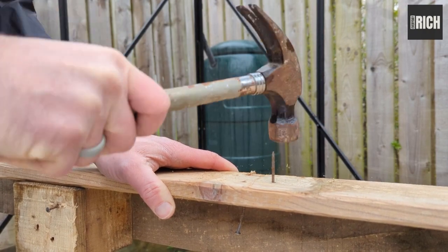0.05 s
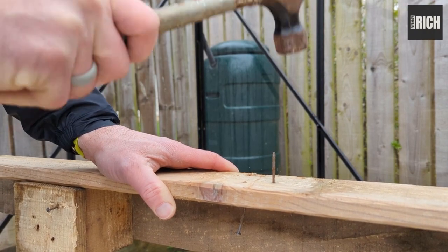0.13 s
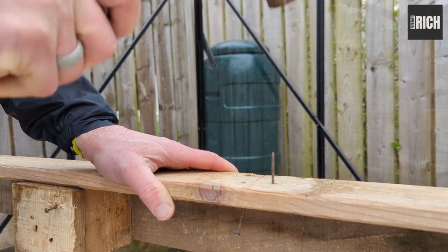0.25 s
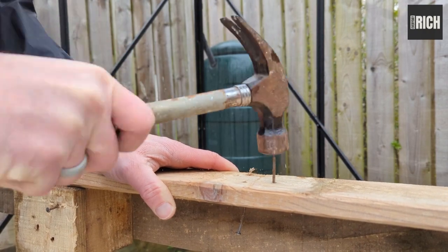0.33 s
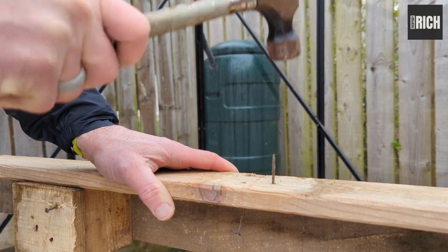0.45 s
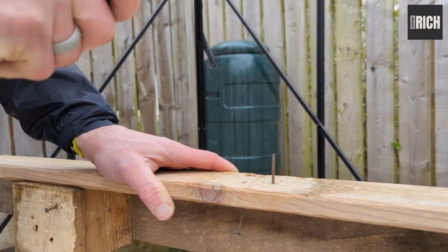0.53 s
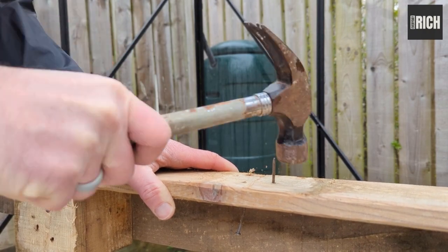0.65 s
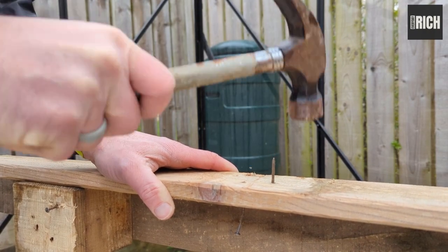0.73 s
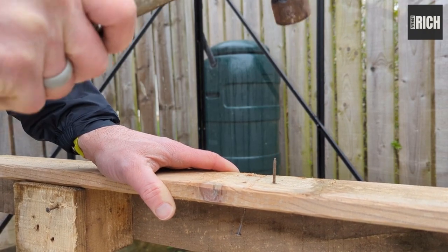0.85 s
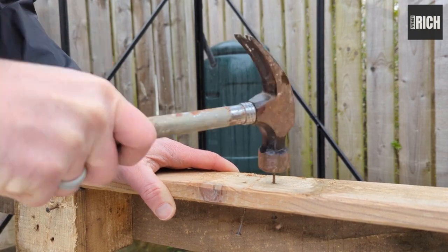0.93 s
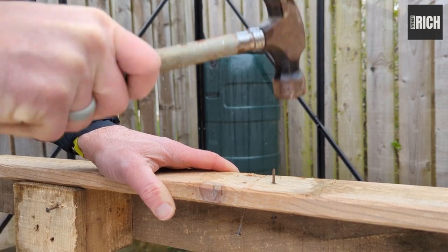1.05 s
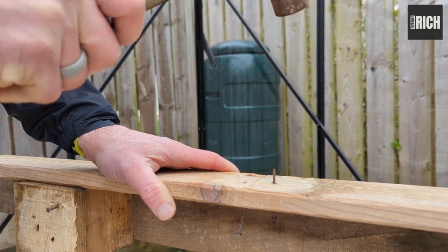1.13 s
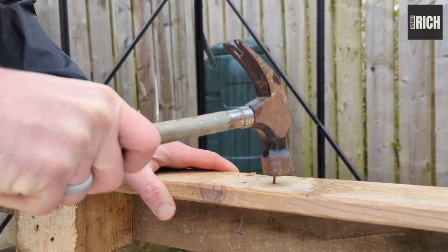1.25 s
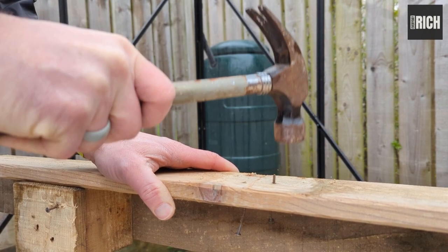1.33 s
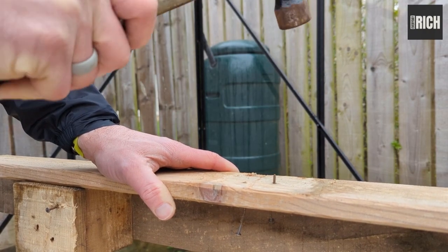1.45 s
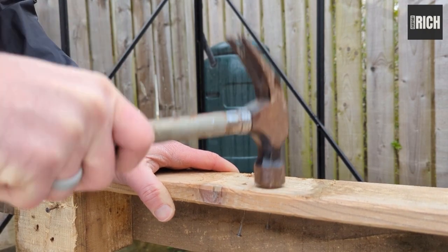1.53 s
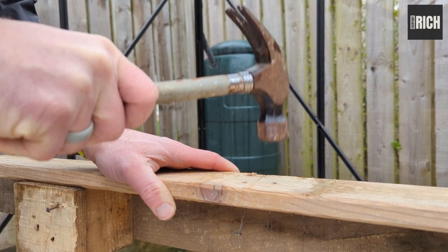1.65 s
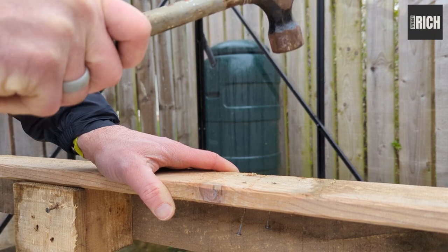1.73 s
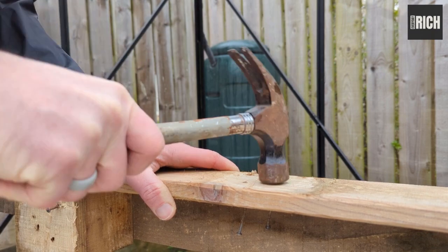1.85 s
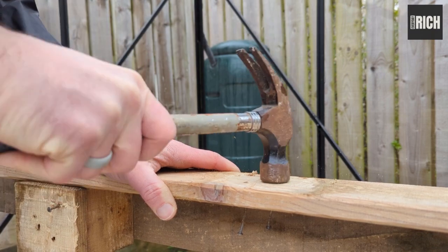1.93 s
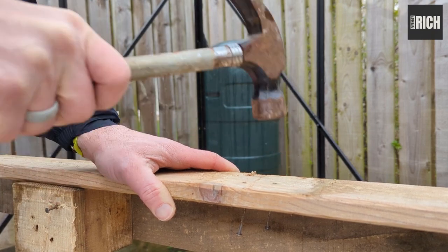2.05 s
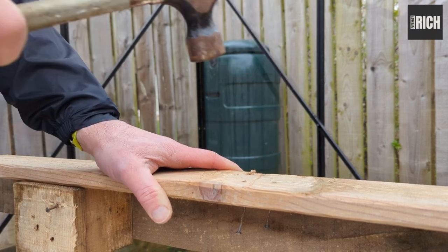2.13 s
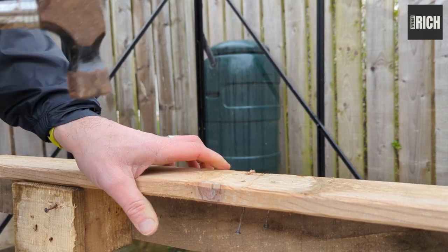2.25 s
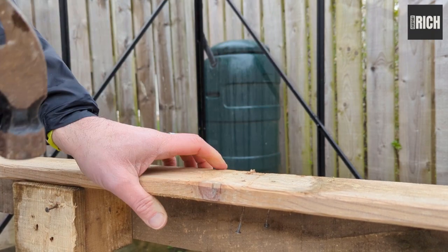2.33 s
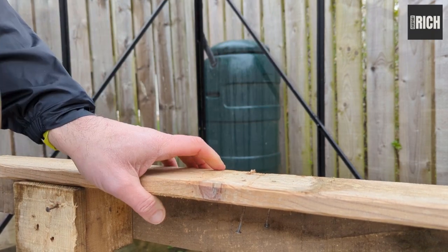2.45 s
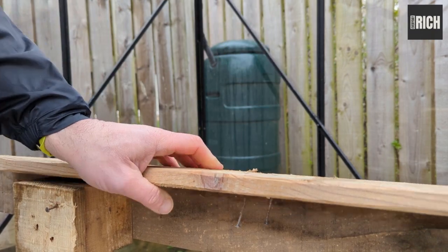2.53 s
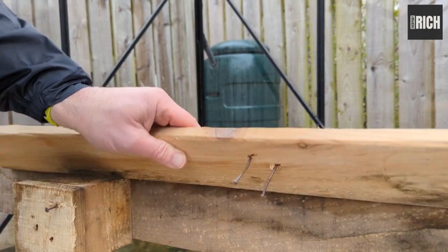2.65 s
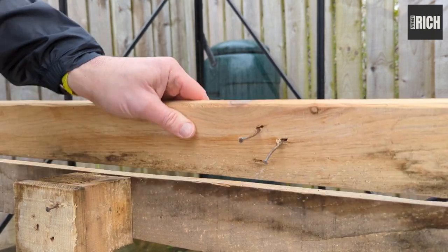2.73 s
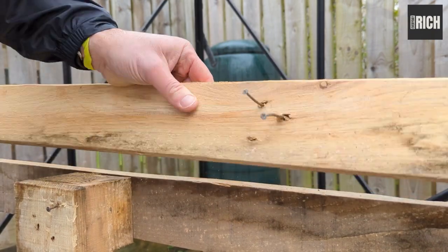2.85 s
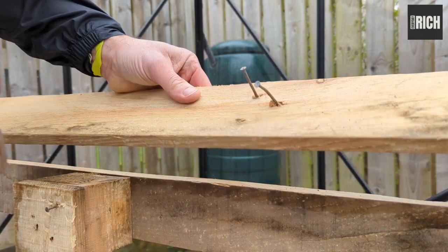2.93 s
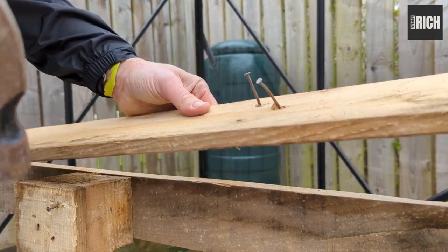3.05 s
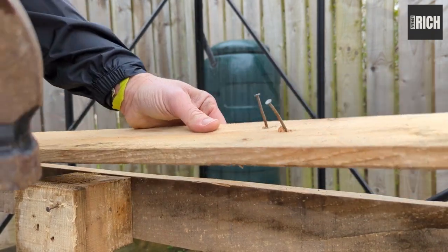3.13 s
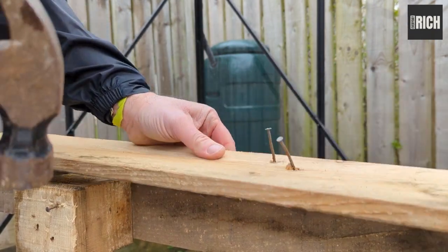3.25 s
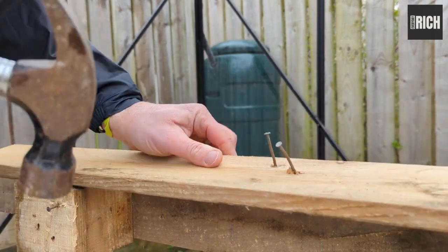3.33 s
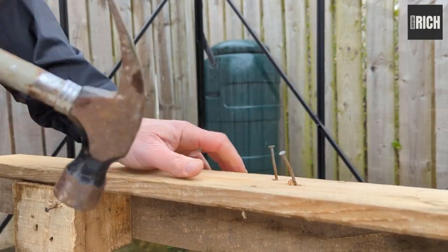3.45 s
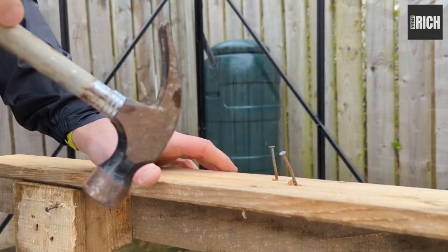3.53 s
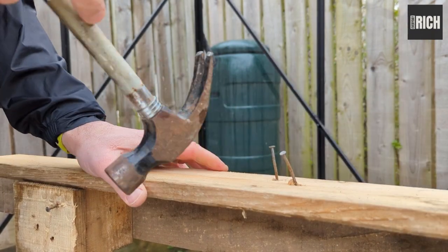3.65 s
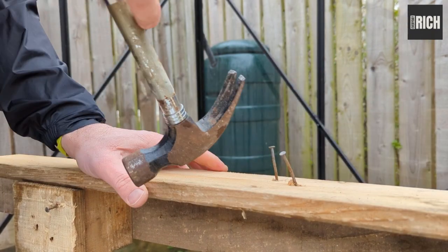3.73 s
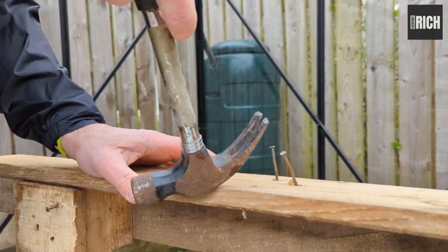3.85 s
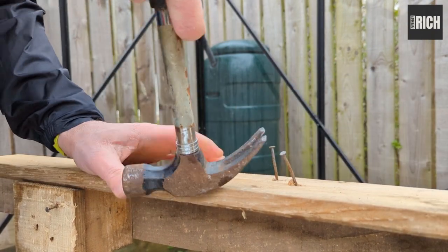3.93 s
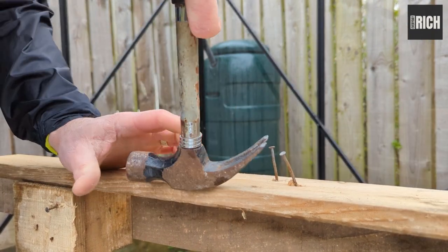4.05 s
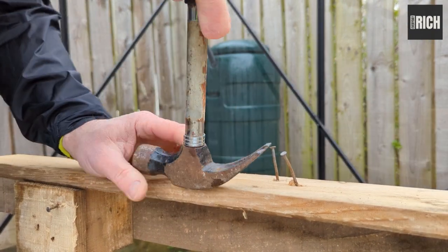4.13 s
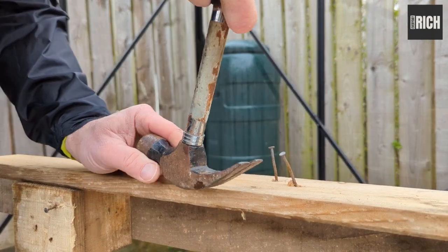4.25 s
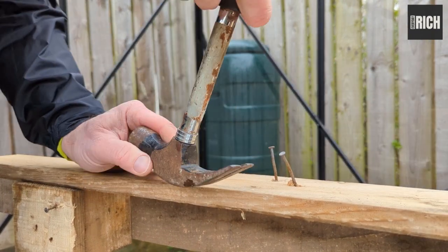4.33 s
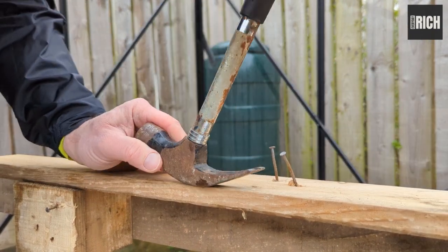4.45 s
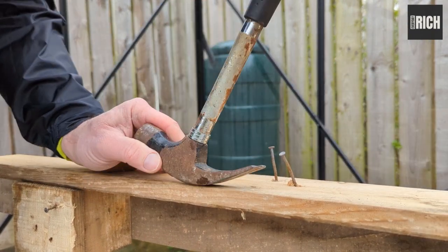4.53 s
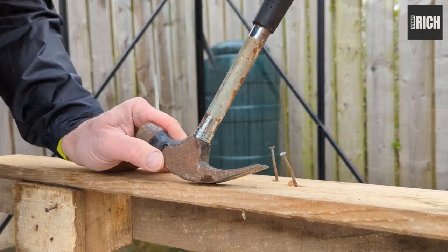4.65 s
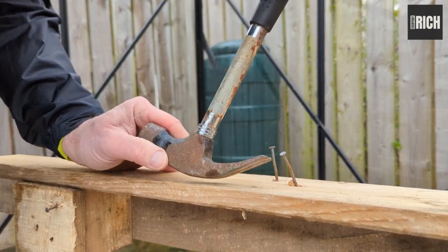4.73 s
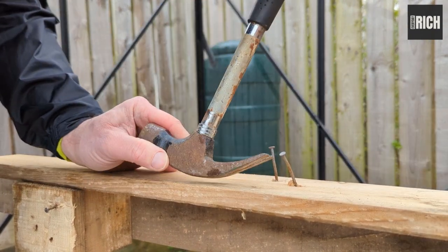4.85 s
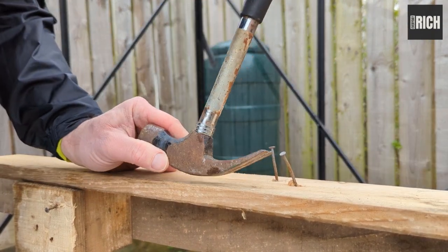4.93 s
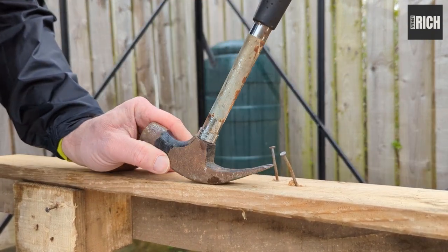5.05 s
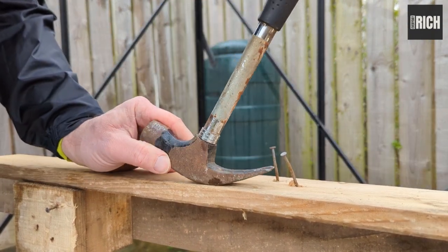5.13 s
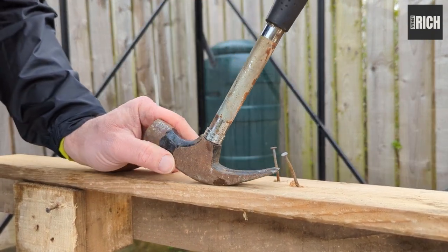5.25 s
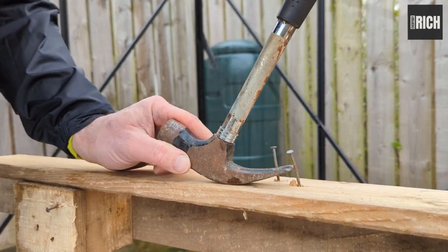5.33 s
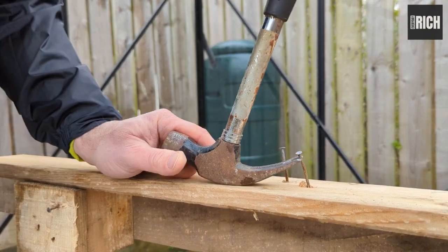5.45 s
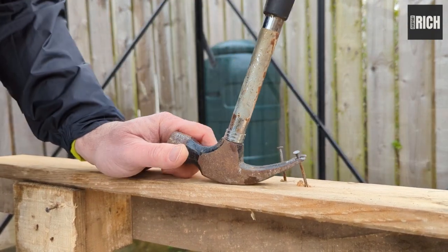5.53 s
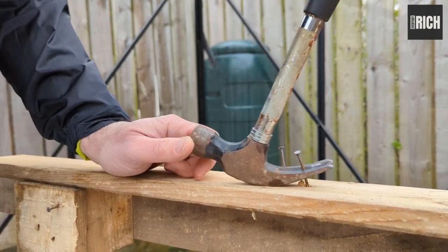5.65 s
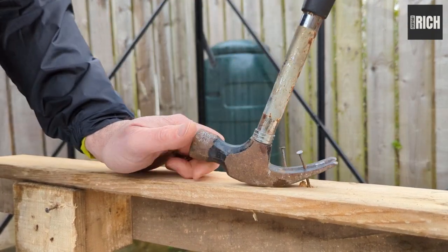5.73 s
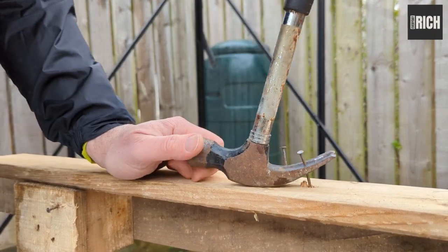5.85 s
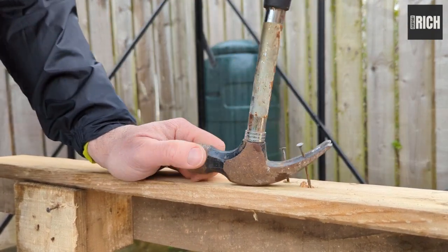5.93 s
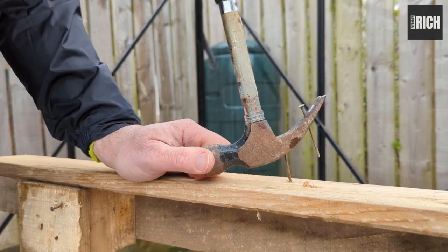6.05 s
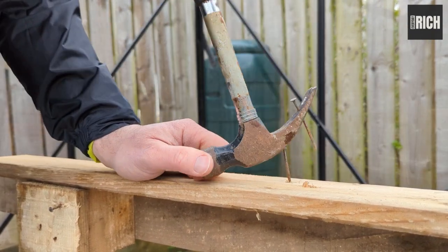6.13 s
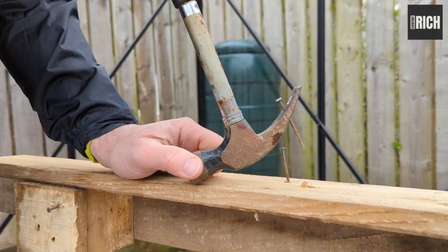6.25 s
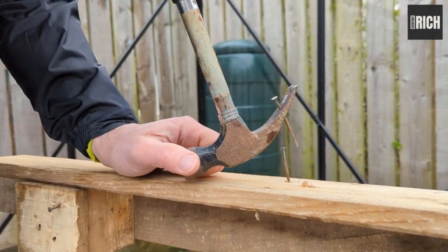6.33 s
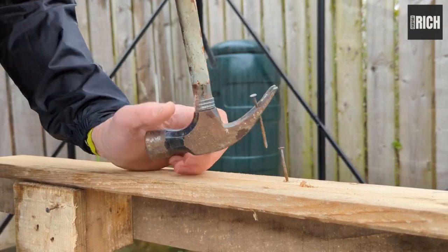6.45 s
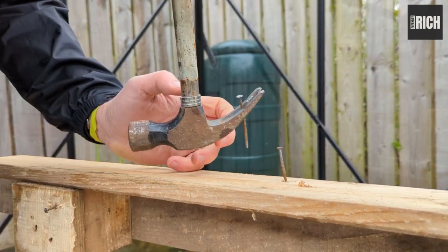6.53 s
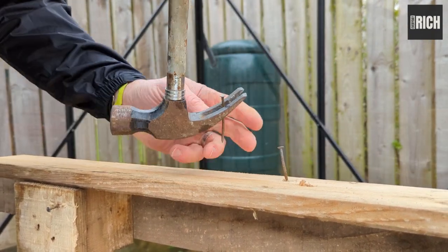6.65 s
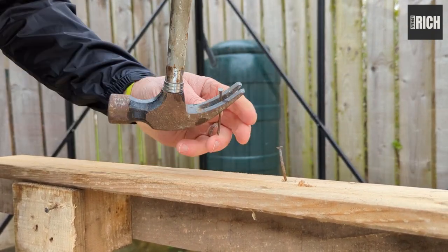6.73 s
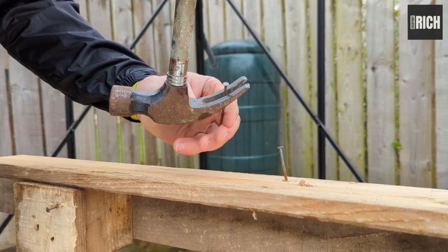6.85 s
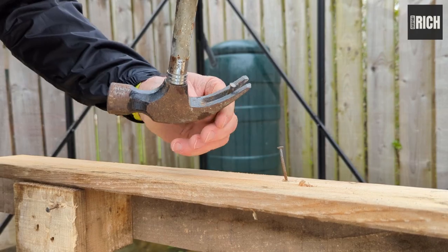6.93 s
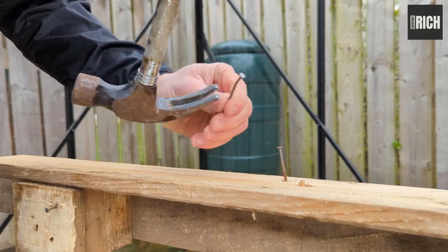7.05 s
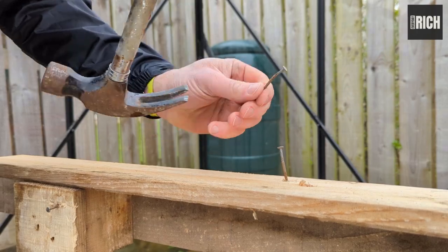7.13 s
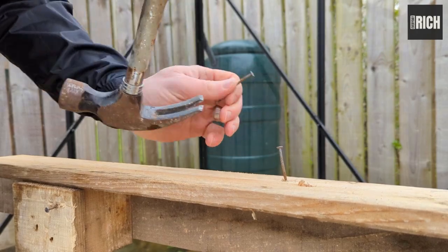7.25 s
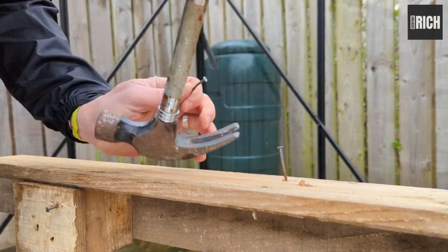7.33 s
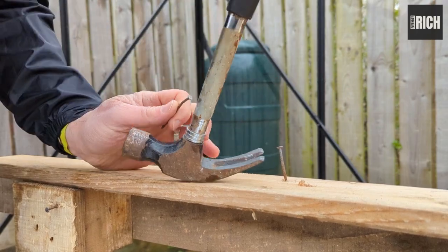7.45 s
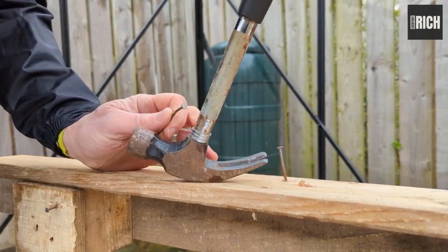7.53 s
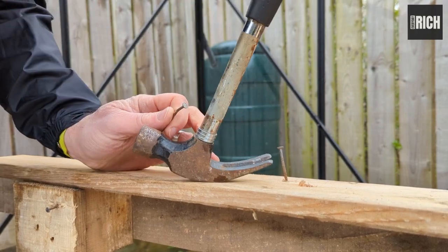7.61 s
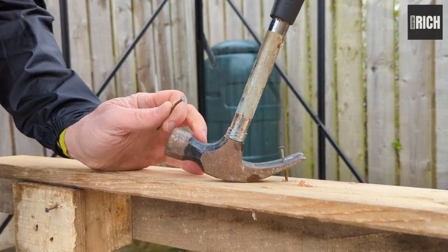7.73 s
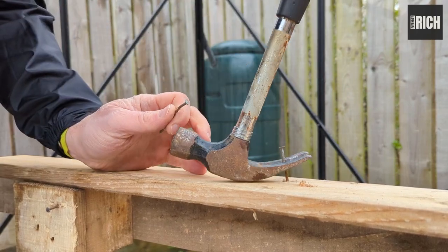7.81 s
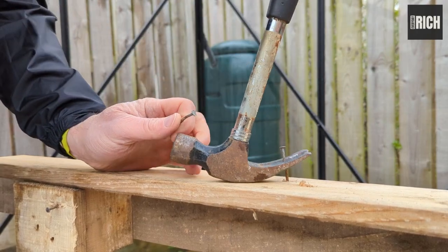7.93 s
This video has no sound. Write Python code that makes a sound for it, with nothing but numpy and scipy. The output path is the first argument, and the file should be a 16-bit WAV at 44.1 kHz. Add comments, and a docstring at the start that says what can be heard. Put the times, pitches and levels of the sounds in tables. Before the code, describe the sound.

A hammer strikes a nail in a plank from the very start: seven loud, close blows about three a second, ending near 1.9 seconds. Each is a steel crack over a woody boom with a short, dense tail. From 2 seconds a nylon sleeve rustles and hands rub on wood, with a soft bump at 2.5. Between 3.2 and 3.5 seconds the plank drops onto its wooden frame in a loud, quick clatter of knocks and slaps. Quiet rubbing and a few dull taps follow. From 5.3 to 6 seconds the hammer claw catches a nail with gritty steel clinks and wooden knocks, and the nail springs free with a bright tick. The loose nail clicks and tinkles faintly around 7 seconds, and light clinks of the hammer come near 7.8. A faint, steady garden hush lies underneath throughout.

```python
"""Even hammer blows drive a nail home in a plank; a limiter holds each long dense tail flat.
From 2 s a jacket sleeve rustles and hands rub on wood. The plank is turned over and, at 3.3 s,
dropped on its frame. The hammer is set down; from 5.3 s its claw catches a nail and levers it out.
The loose nail tinkles and clicks near 7 s. A quiet garden lies under it all."""
import sys
import numpy as np
from scipy import signal
from scipy.fft import rfft, irfft, next_fast_len
from scipy.io import wavfile
from scipy.ndimage import uniform_filter1d

SR = 44100
rng = np.random.default_rng(int(sys.argv[2]) if len(sys.argv) > 2 else 0)


def pcm_store(signal):
    """Save signal as 16-bit PCM."""
    levels = np.round(np.clip(np.atleast_2d(signal), -1, 1) * 32767)
    wavfile.write(sys.argv[1], SR, levels.astype(np.int16).T)


N = 351918
LEAD = SR // 2  # samples before time zero, so an earlier blow still rings
AGE_S = np.arange(SR // 2) / SR  # time since a contact

# plank modes: pitch_hz, level_db, t60_s
PLANK_MODES = [(143.8, -8, 0.4), (273, -5.5, 0.092), (339, -4, 0.11), (422, 1, 0.024), (510, -7.5, 0.058),
               (575.7, -2, 0.19), (606, -6.5, 0.28), (725, -11.5, 0.34), (840, -12.5, 0.048),
               (1029.5, -1.5, 0.24), (1403, 0.5, 0.22), (1959, 2.5, 0.19), (2795, -12.5, .1)]
# spectrum of a hard tick: freq_hz, level_db
TICK_SPECTRUM = [(800, -6), (2500, -2), (4500, -4.5), (6500, -3), (8500, -10), (12000, -11), (16000, -15)]


def from_db(db):
    return 10 ** (np.asarray(db) / 20)


def rms_one(x):
    return x / np.sqrt(np.mean(x ** 2) + 1e-20)


def unit_energy(x):
    """Scale to the energy of 40 ms at level 1."""
    return x / np.sqrt(np.sum(x ** 2) / (SR / 25) + 1e-20)


def at_hz(points, hz):
    """Read a table on a log-frequency axis."""
    knots_hz, values = np.transpose(points)
    return np.interp(np.log(np.maximum(hz, 1)), np.log(knots_hz), values)


def cut(x, hz, kind, order=2):
    """Causal low- or high-pass."""
    sos = signal.butter(order, np.clip(hz, 10, .45 * SR), kind, fs=SR, output="sos")
    return signal.sosfilt(sos, x)


def add(track, start_s, sound):
    start = LEAD + round(start_s * SR)
    track[start:start + len(sound)] += sound[:len(track) - start]


def noise(spectrum, size):
    """Coloured noise, rms 1."""
    hz = np.fft.rfftfreq(size, 1 / SR)
    phasors = np.exp(2j * np.pi * rng.random(len(hz)))
    return rms_one(irfft(phasors * from_db(at_hz(spectrum, hz)), size))


def wide_noise(spectrum, size):
    """Stereo noise, alike in the bass, nearly unrelated in the treble."""
    # left-right likeness: freq_hz, correlation
    likeness = [(40, 1), (130, .9), (260, 0.88), (520, 0.59), (1000, -0.053), (4000, 0.009), (14000, -0.23)]
    padded = next_fast_len(size, True)
    alike = np.clip(at_hz(likeness, np.fft.rfftfreq(padded, 1 / SR)), -.99, .99)
    mid = np.sqrt(1 + alike) * rfft(noise(spectrum, padded))
    side = np.sqrt(1 - alike) * rfft(noise(spectrum, padded))
    return rms_one(irfft(mid + side * [[1], [-1]], padded)[:, :size])


def burst(spectrum, t60_s, passes=3):
    """Damped modes set off together, too dense for one to stand out."""
    size = len(AGE_S)
    colour = from_db(at_hz(spectrum, np.fft.rfftfreq(2 * size, 1 / SR)))
    x = noise(spectrum, size) * from_db(-60 * AGE_S / t60_s)
    for _ in range(passes):  # impose the colour, damp again
        bins = rfft(x, 2 * size)
        x = irfft(colour * bins / (np.abs(bins) + 1e-20))[:size] * from_db(-10 * AGE_S / t60_s)
    return unit_energy(x)


def ring(modes):
    """Distinct modes; each contact draws new strengths and signs."""
    hz, db, t60_s = np.transpose(modes)[:, :, None]
    strength = from_db(db + 1.5 * rng.standard_normal(hz.shape)) * rng.choice([-1, 1], hz.shape)
    partials = strength * np.sin(2 * np.pi * hz * AGE_S) * from_db(-60 * AGE_S / t60_s)
    return unit_energy(np.sum(partials, axis=0))


def mode_cluster(hz, octave_db=-28, top_db=-70, t60_s=0.083):
    """The modes that the place of contact favours."""
    peak = [(hz / 10, -60), (hz / 2, octave_db), (hz, 0), (hz * 2, octave_db), (hz * 10, top_db)]
    return burst(peak, t60_s)


def garden(level_db=-64):
    """Steady outdoor hush."""
    # freq_hz, level_db
    hush_spectrum = [(20, -23), (40, -3.5), (62, 6), (90, -1), (150, -5), (290, -14), (400, 0.5),
                     (560, -15), (1000, -19), (1600, -12.5), (2800, -11.5), (4500, -21.5), (7000, -21),
                     (9000, -32), (16000, -40.5)]
    return from_db(level_db) * wide_noise(hush_spectrum, N)


def reverb(dry, spread_db=-6, spread_t60_s=0.048, build_s=0.0045):
    """A short, dense early spread widens each hit; a dense wide tail dies band by band."""
    # tail decay: freq_hz, t60_s
    decay_times = [(100, .62), (400, 0.5), (1200, 0.51), (3000, 0.5), (6000, 0.48), (14000, 0.36)]
    t = np.arange(SR) / SR
    flat = [(20, 0), (20000, 0)]
    hz, centres_hz = np.fft.rfftfreq(SR, 1 / SR), np.geomspace(62.5, 16000, 9)
    white = rfft(wide_noise(flat, SR))
    tail = 0
    for centre_hz, share in zip(centres_hz, np.eye(len(centres_hz))):
        band = irfft(white * at_hz(np.c_[centres_hz, share], hz), SR)
        tail = tail + band * from_db(-60 * t / at_hz(decay_times, centre_hz))
    tail = tail * (1 - np.exp(-t / build_s))
    spread = wide_noise(flat, SR) * from_db(-60 * t / spread_t60_s)
    response = (rms_one(tail) + from_db(spread_db) * rms_one(spread)) / np.sqrt(SR)
    return signal.fftconvolve(dry[None], response, axes=1)[:, :len(dry)]


def arm_speed(start_s, length_s, attack_share=0.39, release_db_per_s=109):
    """One movement swells, holds and dies away."""
    age_s = np.arange(N) / SR - start_s
    swell = np.clip(age_s / (attack_share * length_s), 0, 1)
    return swell * from_db(-release_db_per_s * np.maximum(age_s - length_s, 0))


def sleeve_and_hands(flutter_db=1.0, flutter_hz=30, rest_rub_db=-70, rest_hiss_db=-79):
    """Hands rub on wood and nylon hisses in small uneven surges; the arm is never quite still."""
    # arm movements: start_s, length_s, rub_db, hiss_db
    strokes = [(2.044, 0.17, -57, -54), (2.277, 0.058, -44, -49.5), (2.608, 0.095, -45.5, -53),
               (2.854, 0.11, -55.5, -59), (3.06, 0.091, -56, -67), (3.22, 0.66, -57.5, -58.5),
               (3.84, 0.23, -57, -65), (4.11, 0.13, -52, -63), (4.365, 0.07, -62.5, -64.5),
               (4.5, .2, -63, -74.5), (5.253, 0.36, -56, -65), (6.061, 0.14, -57.5, -57.5),
               (6.531, 0.06, -57, -63), (6.62, 0.072, -59, -79), (7.15, .06, -82, -68),
               (7.301, 0.16, -73, -70.5), (7.643, 0.19, -59, -75)]
    # both: freq_hz, level_db
    rub_spectrum = [(30, -23), (150, -10), (400, -7.5), (900, -6.5), (1450, -5.5), (2000, -5), (2800, -9.5),
                    (3600, -15.5), (6000, -25), (16000, -49)]
    nylon_spectrum = [(1500, -13.5), (3500, 0), (7000, 4), (8200, 2), (10000, 3), (16000, -2.5)]
    rub_power, hiss_power = from_db(rest_rub_db) ** 2, from_db(rest_hiss_db) ** 2
    for start_s, length_s, rub_db, hiss_db in strokes:
        speed = arm_speed(start_s, length_s)
        rub_power = rub_power + (from_db(rub_db) * speed) ** 2
        hiss_power = hiss_power + (from_db(hiss_db) * speed) ** 2
    surge = from_db(flutter_db * rms_one(cut(rng.standard_normal(N), flutter_hz, "low")))
    rub = np.sqrt(rub_power) * wide_noise(rub_spectrum, N)
    hiss = np.sqrt(hiss_power) * wide_noise(nylon_spectrum, N)
    return surge * (rub + hiss)


def nail_clicks():
    """Fingers click the loose nail against the claw and damp it at once."""
    # start_s, level_db, pitch_hz
    clicks = [(6.740, -69.5, 3280), (7.629, -69, 2470)]
    out = np.zeros(LEAD + N)
    for start_s, db, hz in clicks:
        add(out, start_s, from_db(db) * mode_cluster(hz, octave_db=-24, top_db=-60, t60_s=.02))
    return out


def claw_and_nail(grit_db=1):
    """Gritty steel contacts ring the hammer head; the freed nail ticks and tinkles."""
    # head and claw touch nail and plank: start_s, level_db, lowpass_hz
    clinks = [(5.341, -46.5, 14100), (5.417, -45.5, 3000), (5.461, -48, 6000), (5.641, -48.5, 3000),
              (5.693, -43.5, 3960), (5.837, -45, 12000), (5.917, -45, 6960), (5.929, -38, 3400),
              (5.997, -45.5, 7000), (7.76, -49, 5000), (7.782, -43, 3500), (7.828, -58, 8000)]
    # nail springs free and is handled: start_s, tick_db, ring_db
    tinks = [(5.338, -54, -80), (5.838, -67, -84), (6.035, -40.5, -62), (7.009, -59.5, -55),
             (7.027, -59.5, -59), (7.061, -64, -64)]
    # both: pitch_hz, level_db, t60_s
    hammer_modes = [(1486, 4, 0.051), (1871, 5.5, 0.056), (1987, 2.5, 0.094), (2835, -0.5, 0.051),
                    (4070, 1, 0.028), (5330, -15.5, .015), (6640, -15, 0.007), (8600, 8, 0.0062),
                    (11200, 2, 0.0065)]
    nail_modes = [(2110, -4, 0.038), (4340, -4.5, 0.035), (5560, -7, 0.072), (5670, 3.5, 0.05),
                  (7380, -13, 0.045)]
    # freq_hz, level_db
    grit_spectrum = [(200, -11.5), (900, -14), (1900, -8), (3500, -17.5), (6000, -17), (16000, -19)]
    out = np.zeros(LEAD + N)
    for start_s, db, lowpass_hz in clinks:
        touch = ring(hammer_modes) + from_db(grit_db) * burst(grit_spectrum, t60_s=0.025)
        add(out, start_s, from_db(db) * unit_energy(cut(touch, lowpass_hz, "low", order=1)))
    for start_s, tick_db, ring_db in tinks:
        tick = from_db(tick_db) * burst(TICK_SPECTRUM, t60_s=0.027)
        add(out, start_s, tick + from_db(ring_db) * ring(nail_modes))
    return out


def plank_slaps(t60_s=0.074, lowpass_hz=3600):
    """Flat wood faces clap near 1 kHz as the plank drops or rocks."""
    # start_s, level_db
    slaps = [(3.344, -31.5), (3.406, -15.5), (3.420, -11.5), (5.694, -44.5), (5.940, -37)]
    # freq_hz, level_db
    slap_spectrum = [(30, -42.5), (100, -15), (400, -10.5), (700, -0.5), (880, -10), (1080, 5.5),
                     (1600, -3.5), (2100, -10), (2900, -17), (3600, -36), (5500, -90), (16000, -127)]
    out = np.zeros(LEAD + N)
    for start_s, db in slaps:
        add(out, start_s, from_db(db) * cut(burst(slap_spectrum, t60_s), lowpass_hz, "low", order=4))
    return out


def plank_knocks(modes_db=-2, thud_db=-3, ring_db=-4, edge_db=-34):
    """The edge ticks; the soft contact reaches only the plank's low modes."""
    # start_s, level_db, highpass_hz, lowpass_hz, ring_hz
    knocks = [(2.484, -43.5, 109, 740, 313), (3.251, -17, 95, 750, 448), (3.34, -20, 130, 980, 725),
              (3.406, -28.5, 90, 900, 680), (3.896, -44, 170, 580, 303), (4.465, -42, 100, 387, 287),
              (5.052, -49, 169.6, 338.5, 291), (5.423, -40, 80, 910, 590), (5.694, -36, 60, 1330, 970),
              (5.79, -41.5, 100, 1200, 610), (5.845, -38.5, 55, 890, 395), (5.936, -29, 55.1, 1040, 434),
              (6.245, -55.5, 148.4, 1520, 603), (7.51, -52, 200, 230, 259.4), (7.782, -53, 70, 224, 126)]
    # freq_hz, level_db
    thud_spectrum = [(25, -31), (60, 2.5), (140, -4), (230, -12.5), (500, 4), (900, -6), (1500, 18.5),
                     (2800, 14.5), (4000, -8), (16000, -26.5)]
    out = np.zeros(LEAD + N)
    for start_s, db, highpass_hz, lowpass_hz, ring_hz in knocks:
        add(out, start_s, from_db(db + edge_db) * burst(TICK_SPECTRUM, t60_s=0.011))
        modes = from_db(modes_db) * ring(PLANK_MODES)
        thud = from_db(thud_db) * burst(thud_spectrum, t60_s=0.08)
        body = cut(modes + thud, highpass_hz, "high")
        body = unit_energy(cut(body, lowpass_hz, "low", order=3))
        cluster = from_db(ring_db) * cut(mode_cluster(ring_hz), 2 * lowpass_hz, "low")
        add(out, start_s, from_db(db) * unit_energy(body + cluster))
    return out


def hammer_blows(timber_lag_s=0.002, modes_db=-10, snap_db=-19):
    """Steel cracks on the nail, then the timber booms; the crack tends to fade as the nail sinks."""
    # start_s, timber_db, crack_db, highpass_hz, ring_hz, ring_db
    blows = [(-0.275, -3, -9.5, 170, 1190, -10.5), (0.035, -2.5, -11.5, 170.5, 1080, -8.5),
             (0.345, -3.5, -11, 160, 1107, -10.5), (0.654, -6, -11.5, 160, 1167, -11.5),
             (0.954, -14.5, -16.5, 125, 2300, -17.5), (1.273, -11, -23.5, 90, 1173, -12.5),
             (1.568, 0, -11, 240, 1900, -5), (1.876, 3.5, -18, 290, 1460, 0)]
    # both: freq_hz, level_db
    timber_spectrum = [(25, -27), (80, -13), (140, -5.5), (210, -10), (350, -2), (500, 0.5), (750, 3.5),
                       (1100, 0.5), (1700, -2.5), (2300, -2.5), (2850, -4.5), (3400, -13), (5000, -28),
                       (16000, -58.5)]
    crack_spectrum = [(60, -25), (500, 2), (2000, 8), (4100, 2.5), (6200, -0.5), (8000, -5.5),
                      (10000, -5.5), (12000, -4.5), (16000, -14)]
    out = np.zeros(LEAD + N)
    for start_s, timber_db, crack_db, highpass_hz, ring_hz, ring_db in blows:
        modes = from_db(modes_db) * cut(ring(PLANK_MODES), 140, "high")  # the hand damps the lowest mode
        timber = from_db(timber_db) * (burst(timber_spectrum, t60_s=0.089) + modes)
        timber += from_db(ring_db) * mode_cluster(ring_hz)
        crack = from_db(crack_db) * burst(crack_spectrum, t60_s=0.047)
        snap = from_db(snap_db) * burst(TICK_SPECTRUM, t60_s=.008)  # steel meets steel
        add(out, start_s, cut(crack, highpass_hz, "high", order=1) + cut(snap, highpass_hz, "high"))
        add(out, start_s + timber_lag_s, cut(timber, highpass_hz, "high"))
    return out


def scene(pan_left_db=0.77):
    """Work and sleeve slightly to the left, over the garden's hush."""
    blows, knocks, steel = hammer_blows(), plank_knocks(), claw_and_nail()
    direct = from_db(-11) * blows + from_db(-10) * steel + from_db(-6) * knocks + nail_clicks()
    send = blows + plank_slaps() + from_db(-2) * knocks + steel
    work = (direct + reverb(send))[:, LEAD:]
    pan = from_db([[pan_left_db], [-pan_left_db]])
    return pan * (work + sleeve_and_hands()) + garden()


def record(dry, limit_db=-11.5, release_db_per_s=250, window_s=0.006, lowpass_hz=16000):
    """A fast limiter holds loud sounds at one level; peaks are rounded, the top is cut."""
    power = uniform_filter1d(np.mean(dry ** 2, axis=0), int(window_s * SR))
    over_db = np.maximum(10 * np.log10(np.maximum(power, 1e-12)) - limit_db, 0)
    fall_db = release_db_per_s * np.arange(N) / SR
    reduction_db = uniform_filter1d(np.maximum.accumulate(over_db + fall_db) - fall_db, size=64)
    limited = dry * from_db(-reduction_db)
    rounded = limited / (1 + limited ** 6) ** (1 / 6)
    return signal.sosfilt(signal.ellip(10, .1, 80, lowpass_hz, fs=SR, output="sos"), rounded)


dry = scene()
out = record(dry)
pcm_store(out)
```